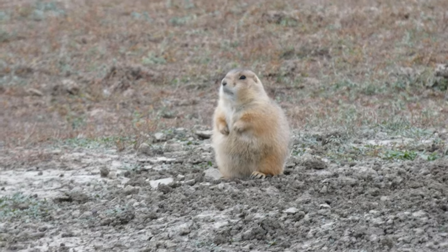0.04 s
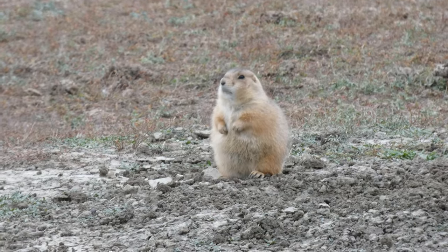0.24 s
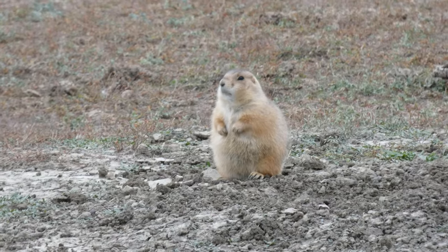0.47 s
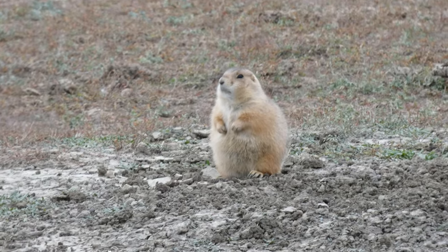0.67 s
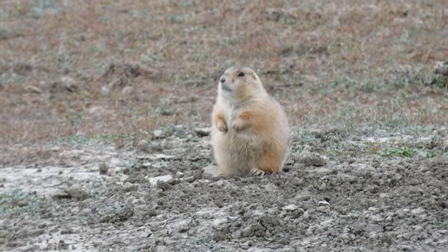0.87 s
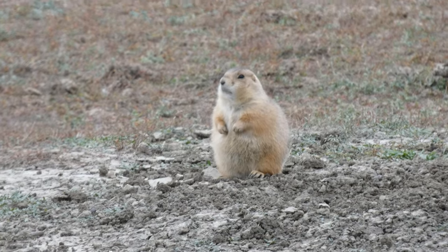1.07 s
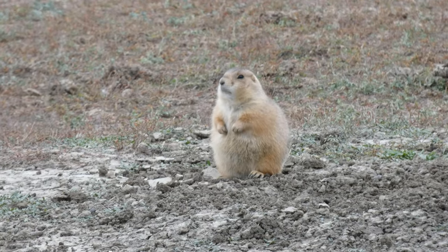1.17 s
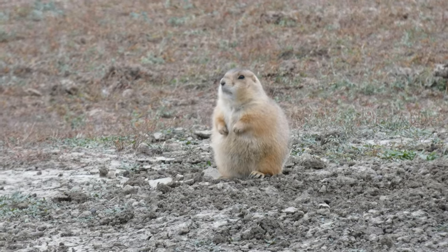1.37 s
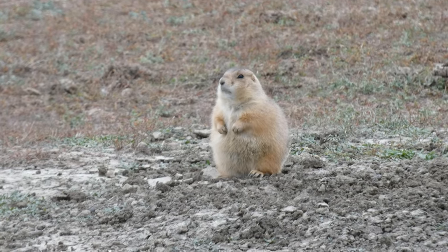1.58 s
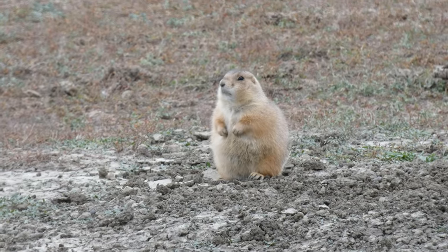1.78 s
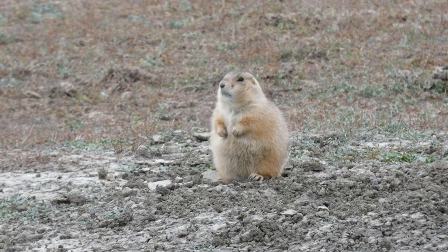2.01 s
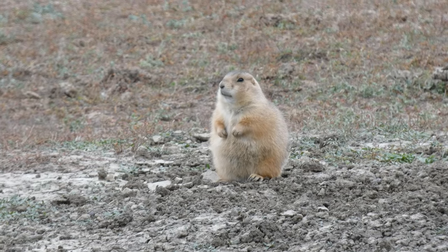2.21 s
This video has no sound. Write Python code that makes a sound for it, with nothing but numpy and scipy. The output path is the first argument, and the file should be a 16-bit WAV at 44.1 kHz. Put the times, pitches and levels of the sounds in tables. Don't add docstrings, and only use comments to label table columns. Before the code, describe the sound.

A prairie dog yips three times, loud, then softer, then rough and two-part, while gusty wind thumps and rumbles on the microphone; faint neighbours call far off across open ground.

```python
import sys
import numpy as np
from scipy import signal
from scipy.fft import rfft, irfft
from scipy.io import wavfile
from scipy.ndimage import uniform_filter1d, minimum_filter1d

SR = 44100
rng = np.random.default_rng(int(sys.argv[2]) if len(sys.argv) > 2 else 0)


def output_pcm(signal):
    pcm = np.clip(np.atleast_2d(signal).T, -1, 1) * 32767
    wavfile.write(sys.argv[1], SR, np.round(pcm).astype(np.int16))


def volts_from_db(level):
    exponent = np.asarray(level, float) / 20
    return 10 ** exponent


N = 99225

PORT_SIDE = np.array([[.5], [-.5]])


def evened(x):
    return x / np.sqrt(np.mean(x ** 2) + 1e-20)


def read(points, hz):
    f, value = np.transpose(points)
    return np.interp(np.log(hz + 1), np.log(f + 1), value)


def colour(x, gain):
    return irfft(rfft(x) * gain, x.shape[-1])


def drift(shape, seconds):
    size = max(int(seconds * SR), 1)
    once = uniform_filter1d(rng.standard_normal(shape), size)
    return evened(uniform_filter1d(once, size))


def add(mix, s, sound):
    part = mix[..., round(s * SR):][..., :sound.shape[-1]]
    part += sound[..., :part.shape[-1]]


def wind_force_db():
    # time_s, force_db
    gusts = [(0, -50.5), (.15, -38.5), (.3, -39.5), (.44, -32.5), (.63, -47), (.72, -22), (.82, -45),
             (1.03, -30.5), (1.225, -42.5), (1.37, -33), (1.55, -34), (1.68, -49), (1.74, -67),
             (1.86, -26.5), (1.97, -33), (2.06, -51), (2.25, -51)]
    # time_s, force_db, left_right_db, half_length_s
    puffs = [(0.065, -30.5, 8, 0.017), (0.125, -40, 0, 0.006), (0.238, -30, 2, 0.0086),
             (0.228, -28, 16.5, 0.0029), (0.254, -28, -3, 0.03), (0.3, -21.5, -15.5, 0.01),
             (0.334, -19, 8.5, 0.009), (0.366, -12, 4.5, 0.0083), (0.403, -22, 4, 0.014),
             (0.468, -35.5, -1.5, 0.0038), (0.51, -31.5, 8.5, 0.018), (0.53, -26.5, 9, 0.01),
             (0.575, -24, -7, 0.017), (0.61, -27, -5, 0.0095), (0.649, -28.5, 3.5, 0.0041),
             (0.735, -7, -1, 0.0081), (0.792, -24, -11.5, 0.006), (0.837, -28.5, -13.5, 0.0064),
             (0.882, -34, 12, 0.016), (0.966, -36.5, 5, 0.0064), (0.99, -28, 13.5, 0.022),
             (1.024, -17, -0.5, 0.011),
             (1.063, -12.5, 2.5, 0.0074), (1.107, -25, -8, 0.0084), (1.142, -27.5, -13, 0.0041),
                   (1.165, -15, 8, 0.0096), (1.261, -24, 7, 0.01), (1.288, -27.5, -2.5, 0.012),
                   (1.33, -15, 5, 0.011), (1.35, -15, 15.5, 0.005), (1.388, -14, 21, 0.012),
                   (1.434, -37, 14.5, 0.002), (1.449, -37.5, 13, 0.0015), (1.469, -25, 12.5, 0.0055),
                   (1.515, -20.5, -7.5, 0.012), (1.58, -34, 0.5, 0.005), (1.605, -34, -5, 0.005),
                   (1.658, -32.5, -2.5, 0.017), (1.771, -37, 7.5, 0.0021), (1.856, -22, -1.5, 0.0064),
                   (1.869, -7, -3.5, 0.0093), (1.921, -3, -5, 0.012), (1.977, -25, -13, 0.011),
                   (1.982, -26, 9.5, 0.021), (2.15, -37.5, 14.5, 0.0048), (2.22, -34.5, -5, 0.0086)]
    usual_db, puff_db, lumps_db = -30.5, -2, 4.5
    t = np.arange(N) / SR
    gust_db = np.interp(t, *np.transpose(gusts))
    squared = volts_from_db(gust_db + lumps_db * drift((2, N), 0.0061)) ** 2
    for s, db, pan_db, half in puffs:
        peak = volts_from_db(db + puff_db + 0.7 * PORT_SIDE * pan_db) ** 2
        squared += peak * np.exp(-((t - s) / half) ** 2)
    return 10 * np.log10(squared) - usual_db


def turbulence():
    # frequency_hz, level_db
    rumble = [(25, -36.5), (60, -7), (120, 4.5), (230, 3), (450, -6.5), (1000, -25), (2200, -49.5),
              (5000, -85.5), (11000, -105)]
    # centre_hz, share of the force followed (ratio)
    follow = [(45, 0.75), (110, 0.57), (230, 0.94), (500, 1.139), (1100, 1.428), (2400, 1.89)]
    wind_db, flicker_depth_db, patch_db = -30, 4, 3.5
    steadiness = .65
    calm = 1.0
    hz = np.fft.rfftfreq(N, 1 / SR)
    force_db = wind_force_db()
    flicker_db = flicker_depth_db * drift((2, N), 0.002)
    noise = evened(colour(rng.standard_normal((2, N)), volts_from_db(read(rumble, hz))))
    ports = np.zeros((2, N))
    for k, (centre_hz, share) in enumerate(follow):
        band = read([(f, j == k) for j, (f, _) in enumerate(follow)], hz)
        eddies = colour(noise, band)
        beat = uniform_filter1d(eddies ** 2, int(1.5 * SR / centre_hz)) / np.mean(eddies ** 2)
        patchy_db = flicker_db + patch_db * drift((2, N), 0.0064)
        strength = volts_from_db(share * force_db + min(share, calm) * patchy_db)
        smooth = uniform_filter1d(strength, int(.8 * SR / centre_hz))
        driven = eddies * smooth / (abs(beat) + 0.028) ** (steadiness / 2)
        ports += colour(driven, np.minimum(band * 3, 1) ** .5)
    return volts_from_db(wind_db) * ports


def diaphragm_flicks():
    # time_s, level_db, left_right_db
    flick_events = [(0.154, -48.5, -3.5), (0.234, -55.5, 5), (0.302, -58.5, 1), (0.358, -46.5, 8),
                    (0.401, -50.5, -11.5), (0.46, -60.5, -3.5), (.528, -53, 10), (0.607, -57, -2),
                    (0.7364, -29.5, -3), (0.7394, -41, 3), (.790, -63, -1), (0.839, -61, -1.5),
                    (1.028, -48, 3.5), (1.0649, -30.5, 18), (1.100, -52.5, -3), (1.115, -58.5, 5),
                    (1.142, -58.5, -5), (1.161, -41, 5), (1.17, -51, 7.5), (1.251, -56, 3.5),
                    (1.309, -56, 2), (1.382, -42, 3.5), (1.388, -45, 4), (1.397, -44.5, 8),
                    (1.465, -63.5, -1), (1.511, -58.5, -5), (1.555, -60, -1), (1.622, -57.5, -1),
                    (1.677, -59, 4), (1.851, -41.5, -4), (1.922, -46.5, -4), (1.976, -54, -5),
                    (1.9797, -39, -9), (1.987, -51.5, 3)]
    # frequency_hz, level_db
    flick_colour = [(500, -12.5), (1200, 1.5), (2400, -5), (4300, -13.5), (5500, -28.5), (8000, -38),
                    (14000, -48)]
    flick_db, grit_share = 24, .17
    flicks = np.zeros((2, N))
    u = np.arange(-128, 128) / (.0007 * SR)
    for s, db, pan_db in flick_events:
        grit = rng.standard_normal(256) * np.exp(-u ** 2)
        click = (u == 0) + grit_share * grit
        add(flicks, s - 128 / SR, volts_from_db(db + flick_db + PORT_SIDE * pan_db) * click)
    return colour(flicks, volts_from_db(read(flick_colour, np.fft.rfftfreq(N, 1 / SR))))


def wind():
    # frequency_hz, share (ratio, negative = inverted)
    cross_mix = [(60, .6), (130, 0.43), (290, 0.3), (640, -0.33), (1400, -0.26), (5000, -0.25)]
    ports = turbulence() + diaphragm_flicks()
    gain = np.clip(read(cross_mix, np.fft.rfftfreq(N, 1 / SR)), -.9, .9)
    return ports + colour(ports[::-1], gain)


def hiss():
    # frequency_hz, level_db
    hiss_colour = [(800, 3.5), (2500, -10.5), (6000, -20), (10000, -22), (15500, -27.5)]
    hz = np.fft.rfftfreq(N, 1 / SR)
    noise = rng.standard_normal((3, N))
    x = colour(noise[:2] + .7 * noise[2], volts_from_db(read(hiss_colour, hz)))
    return volts_from_db(-82) * x / np.std(colour(x.mean(0), hz > 2500))


def voice(hz, orders_db, flutter, bright_db):
    jitter, flutter_hz, waver = .005, 345, .03
    upper, lower, side_fade_db = 1.0, .22, -2.5
    breath_db, breath_per_order_db = -19, 2.6
    count = len(hz)
    shaken_hz = hz * (1 + jitter * drift(4096, .0012)[:count])
    phase = 2 * np.pi * np.cumsum(shaken_hz) / SR
    second_hz = flutter_hz * (1 + waver * drift(4096, .005)[:count])
    slow = np.exp(2j * np.pi * np.cumsum(second_hz) / SR)
    out = 0
    for k, db in enumerate(orders_db):
        lift_db = bright_db * (k > 1)
        blur = drift((2, 4096), .0006)[:, :count].T @ [1, 1j]
        breath = volts_from_db(breath_db + breath_per_order_db * k - lift_db) * blur
        depth = flutter * min(k + 0.53, volts_from_db(side_fade_db * (k + 0.5)))
        line = 1 + depth * (upper * slow + lower / slow) + breath
        out = out + volts_from_db(db + lift_db) * (line * np.exp(1j * (k + 1) * phase)).real
    return np.sqrt(2) * out


def far_call(start, length, top_hz, db, orders_db):
    rise, sag = .11, .06
    u = np.arange(0, 1, 1 / (length * SR))
    arch = np.sin(np.pi * u ** .58)
    hz = top_hz * (1 - rise + rise * arch - sag * u ** 3)
    return start, volts_from_db(db) * arch ** .8 * voice(hz, orders_db, .1 + .4 * u, 0)


def farthest_calls():
    # start_s, length_s, top_pitch_hz, level_db
    faint_calls = [
        (.365, .075, 1390, -85),
        (.495, .05, 1310, -90),
        (.02, .05, 1290, -89),
    ]
    calls = np.zeros(N)
    for row in faint_calls:
        add(calls, *far_call(*row, [-30, -20, -9, -8, 0]))
    return calls


def far_calls():
    # start_s, length_s, top_pitch_hz, level_db
    neighbours = [
        (1.183, .068, 1375, -68),
        (1.748, .04, 1400, -82),
        (2.165, .05, 1410, -85),
        (.03, .035, 1400, -85),
    ]
    far_orders_db = [-22, -8, 0, -13, -10, -26]
    # start_s, length_s, pitch_hz, level_db
    peeps = [
        (2.165, .055, 2480, -82),
    ]
    calls = np.zeros(N)
    for row in neighbours:
        add(calls, *far_call(*row, far_orders_db))
    for row in peeps:
        add(calls, *far_call(*row, [0]))
    return calls


def whistle():
    # time_s, pitch_hz, level_db
    climb = [
        (.603, 3200, -88),
        (.612, 3400, -75),
        (.63, 4100, -80),
        (.641, 4950, -72),
        (.652, 5000, -84),
    ]
    s, *cols = np.transpose(climb)
    t = np.arange(s[0], s[-1], 1 / SR)
    hz, db = (np.interp(t, s, c) for c in cols)
    tone = drift(len(t), 0.001) * np.sin(2 * np.pi * np.cumsum(hz) / SR)
    return s[0], volts_from_db(db) * tone * signal.windows.tukey(len(t), .2)


def bark(rows, orders_db):
    # frequency_hz, level_db
    rasp_colour = [(2400, -20), (4000, 0), (7500, -8), (9800, -17), (11500, -40)]
    s, *cols = np.transpose(rows)
    t = np.arange(s[0], s[-1], 1 / SR)
    hz, db, flutter, bright_db = (np.interp(t, s, c) for c in cols)
    rasp_gain = volts_from_db(read(rasp_colour, np.fft.rfftfreq(4096, 1 / SR)))
    rasp = evened(colour(rng.standard_normal(4096), rasp_gain))[:len(t)]
    folds = voice(hz, orders_db, np.clip(flutter, 0, 2), bright_db)
    sound = folds + volts_from_db(-19 - .5 * bright_db) * rasp
    return s[0], volts_from_db(db) * sound * signal.windows.tukey(len(t), .1)


def near_barks():
    # time_s, pitch_hz, level_db, flutter_depth (ratio), mouth_brightness_db
    bark_curves = [
        [(.656, 1570, -58, 1, 8), (.664, 1740, -39, .6, 7), (.674, 1895, -35, .15, -4),
         (.694, 1815, -30, .25, -3), (.698, 1750, -37, .25, 3), (.713, 1650, -37, .3, 4),
         (.723, 1565, -43, .2, 3), (.728, 1550, -62, .2, 0)],
        [(1.318, 1600, -62, 1.3, 1), (1.326, 1650, -49, 1.2, 3), (1.339, 1740, -47, .7, 1),
         (1.354, 1740, -43, .35, 0), (1.365, 1705, -44, .3, 2), (1.374, 1650, -46, .3, 4),
         (1.379, 1625, -52, .7, 0), (1.389, 1590, -58, .7, -2)],
        [(1.865, 1592, -52, 1.3, 9), (1.873, 1669, -36.5, 1.47, 6), (1.886, 1697, -45.5, 0.93, 4.5),
         (1.903, 1728, -41, 0.02, 5), (1.912, 1690, -36.5, 0, 8.5), (1.919, 1620, -31, 0.6, -7),
         (1.926, 1546, -38.5, 0.7, -13), (1.933, 1580, -83, 0.41, 8)],
    ]
    bark_orders_db = [
        [-13, 1, -12.5, -20.5, -31, -39, -44],
        [-10.5, 4.5, -7, -12, -26, -34],
    ]
    # frequency_hz, level_db
    mouth = [(5500, 0), (6800, 1), (7600, -5), (8500, -5), (9400, 5.5), (10500, -2), (12200, -4.5),
             (13200, 1.5)]
    barks = np.zeros(N)
    for k, rows in enumerate(bark_curves):
        add(barks, *bark(rows, bark_orders_db[min(k, 1)]))
    return colour(barks, volts_from_db(read(mouth, np.fft.rfftfreq(N, 1 / SR))))


def ground(x):
    ground_db, t60_s = -13, .055
    t = np.arange(4096) / SR
    tail = rng.standard_normal((2, 4096)) * volts_from_db(-60 * t / t60_s) * (t > .002)
    tail = tail / np.linalg.norm(tail[0])
    return volts_from_db(ground_db) * signal.fftconvolve(x[None], tail, axes=1)[:, :N]


def scene():
    mix = wind() + hiss()
    distant = farthest_calls()
    add(distant, *whistle())
    dogs = far_calls() + near_barks()
    mix += dogs * volts_from_db(np.array([[1.15], [-1.2]])) + ground(dogs)
    return mix + distant


def roll_off(x):
    return signal.sosfilt(signal.butter(12, 15630, fs=SR, output="sos"), x)


def record(dry):
    knee = .33
    held = -minimum_filter1d(-abs(dry).max(0), size=441)
    peak = uniform_filter1d(held, size=441)
    return roll_off(dry / np.hypot(1, peak / knee))


dry = scene()
out = record(dry)
output_pcm(out)
```